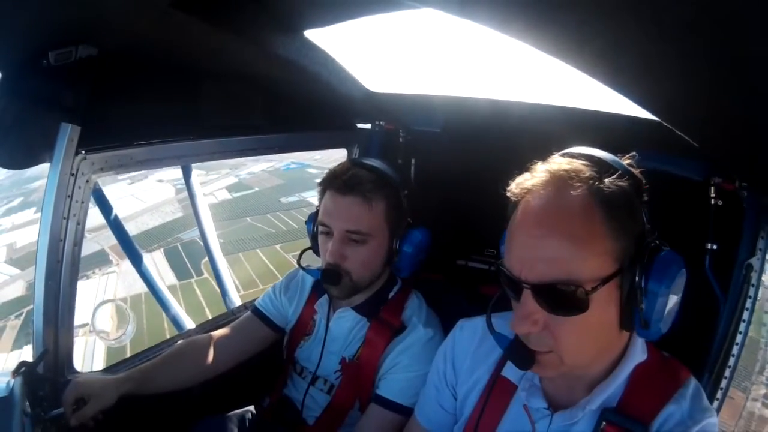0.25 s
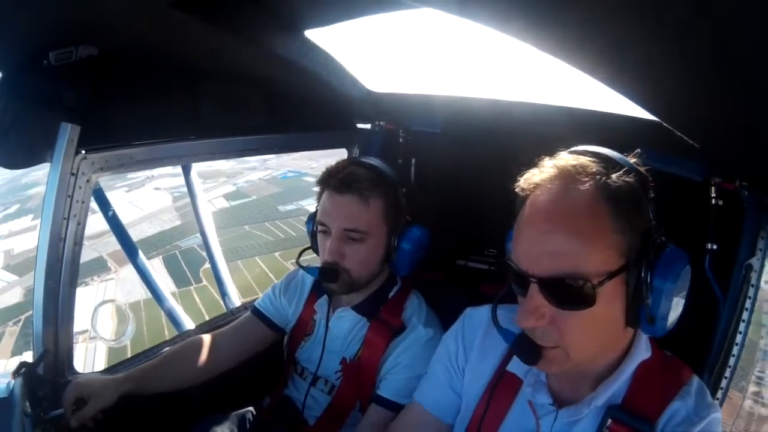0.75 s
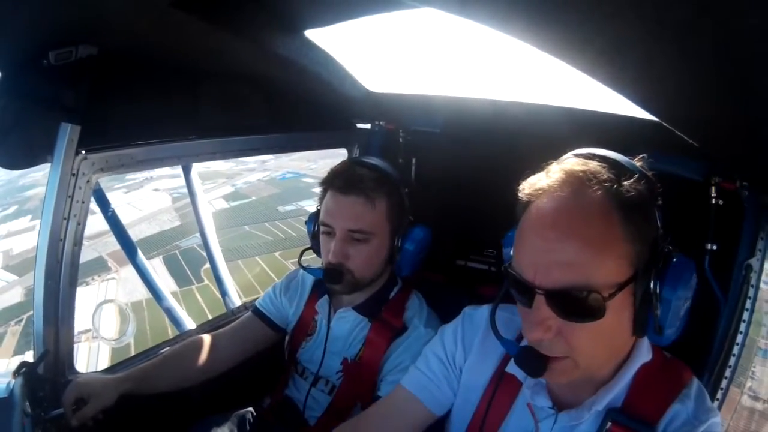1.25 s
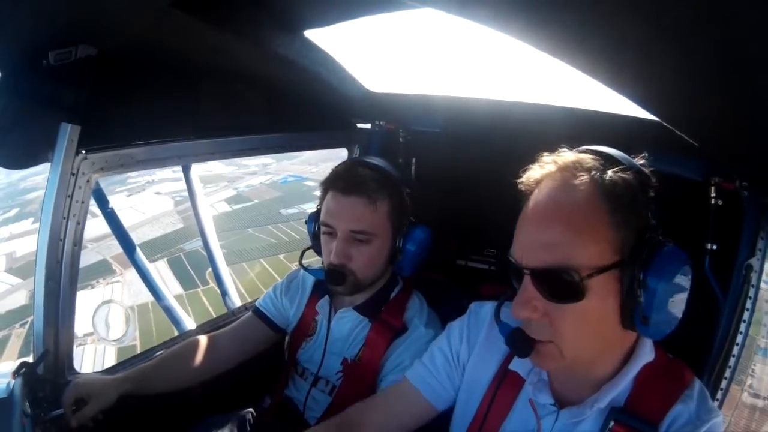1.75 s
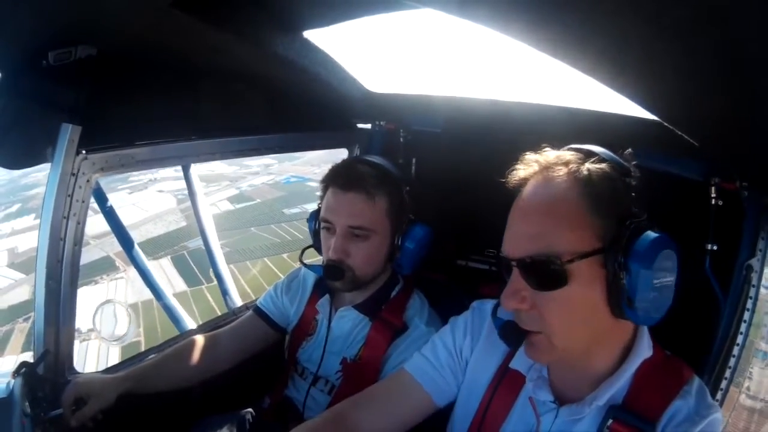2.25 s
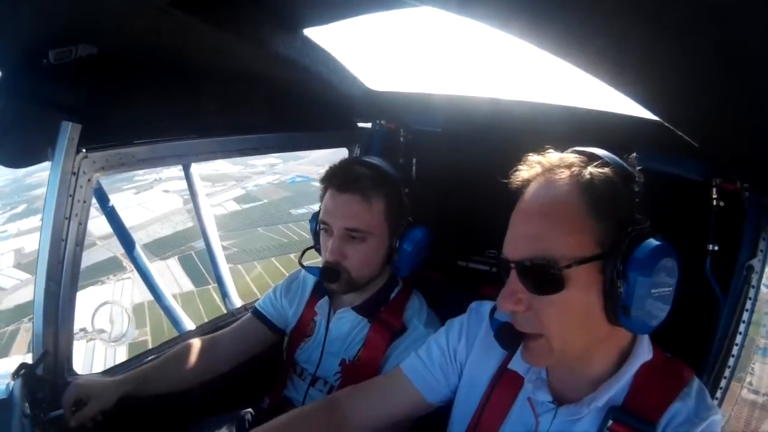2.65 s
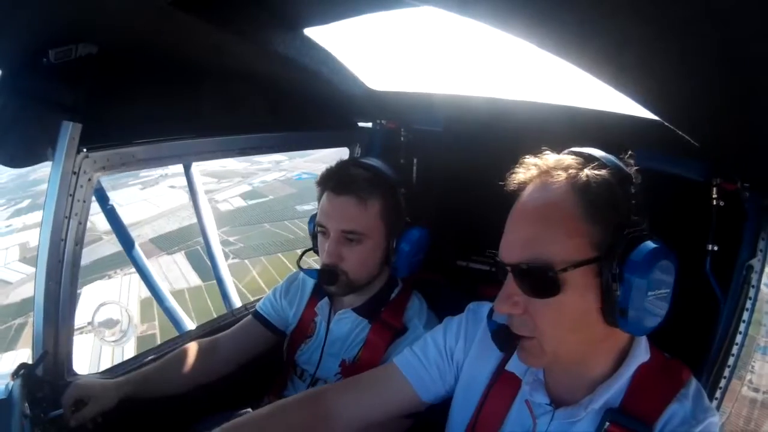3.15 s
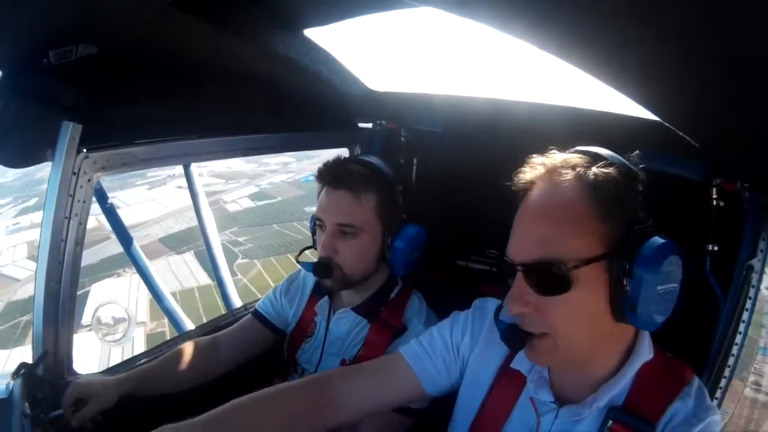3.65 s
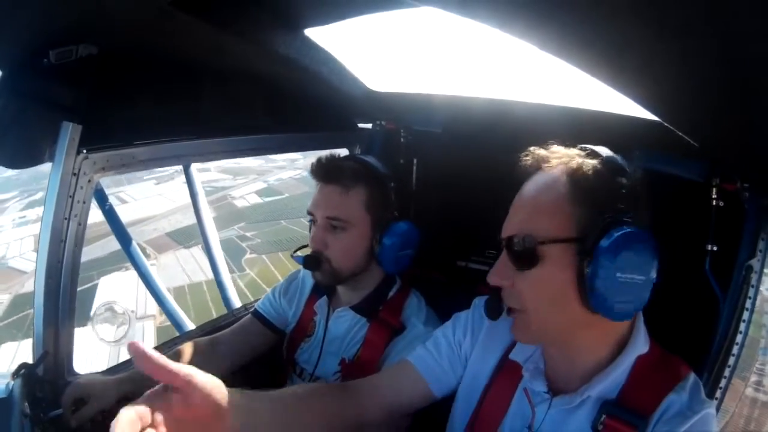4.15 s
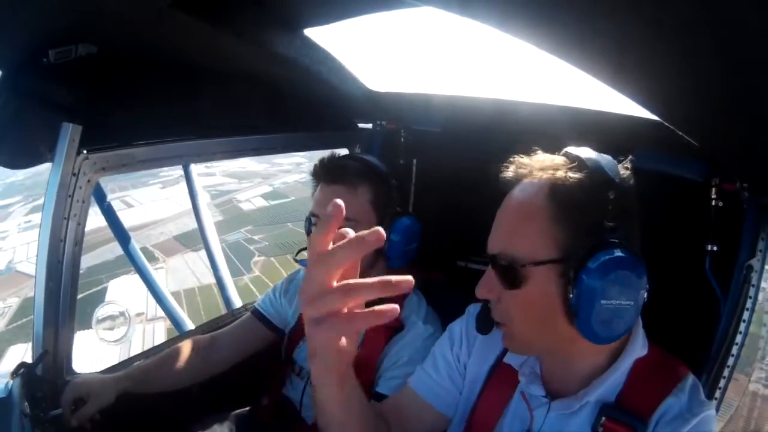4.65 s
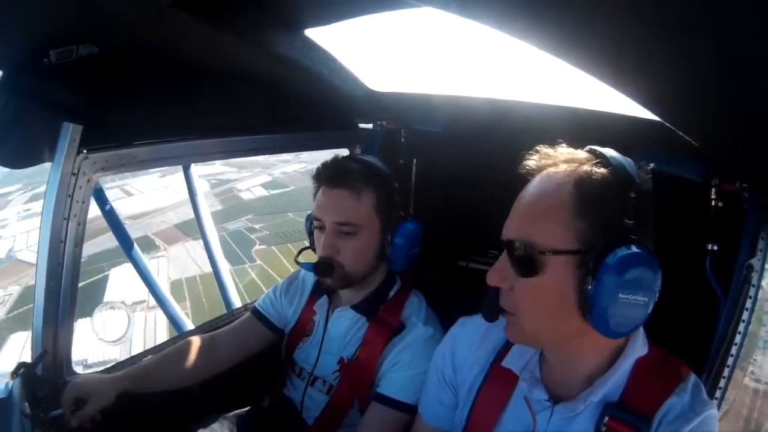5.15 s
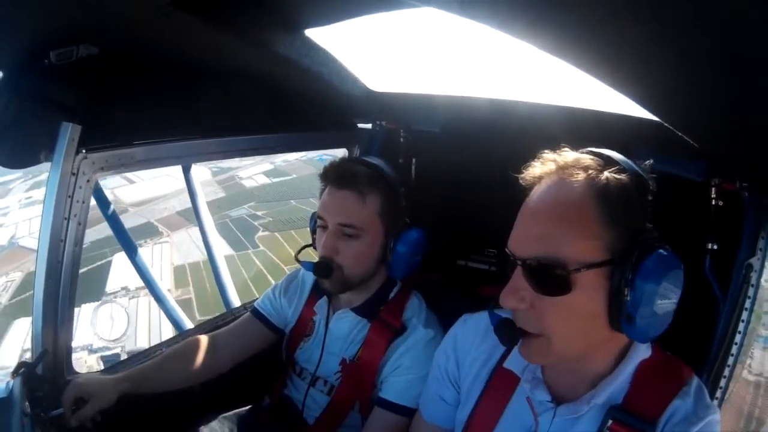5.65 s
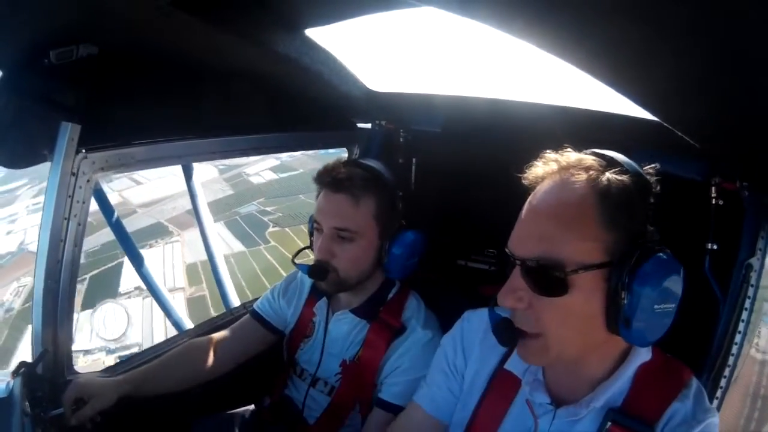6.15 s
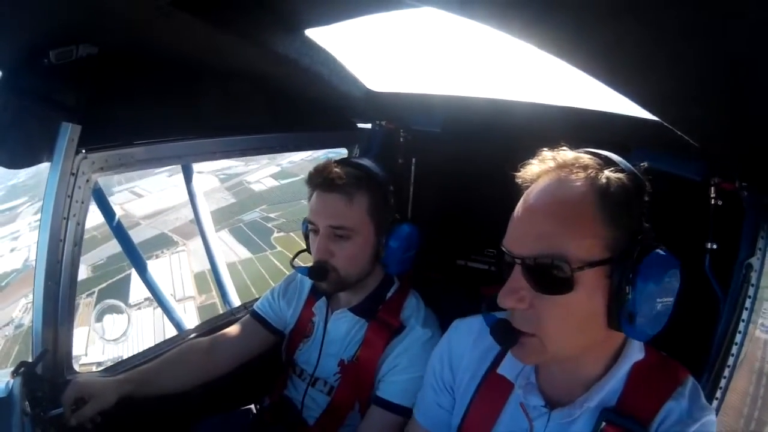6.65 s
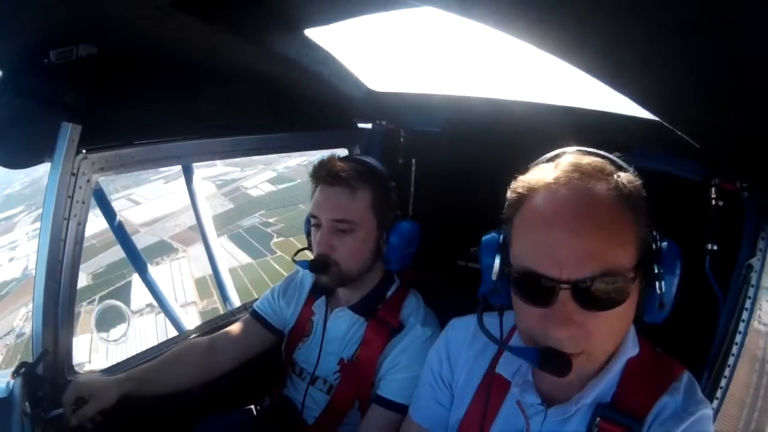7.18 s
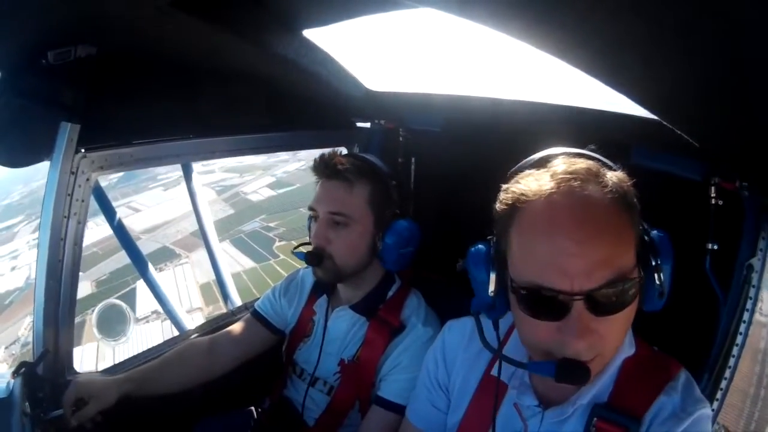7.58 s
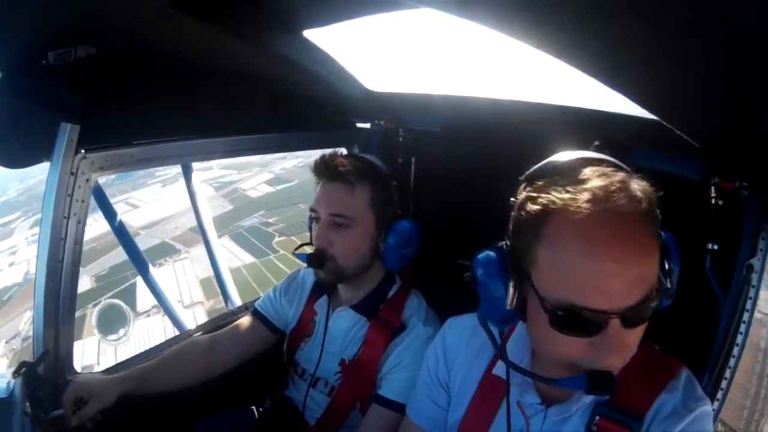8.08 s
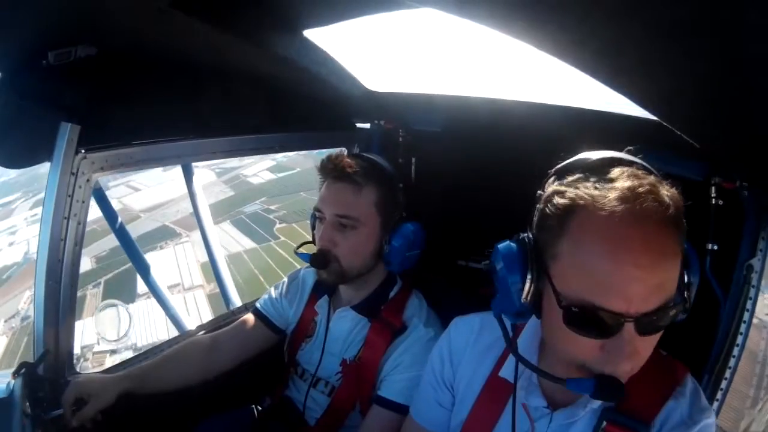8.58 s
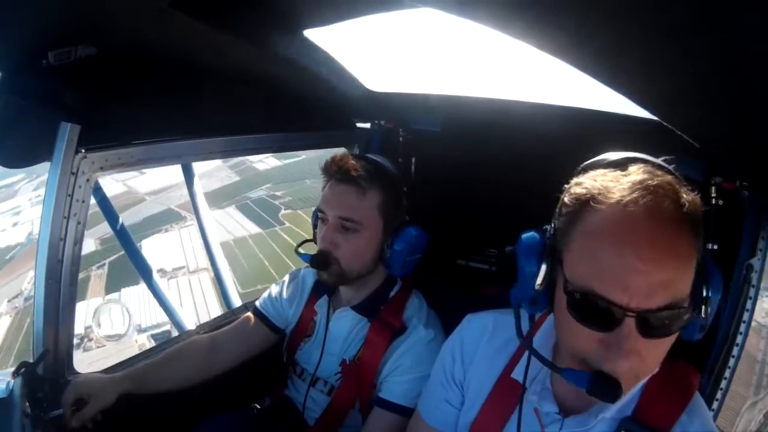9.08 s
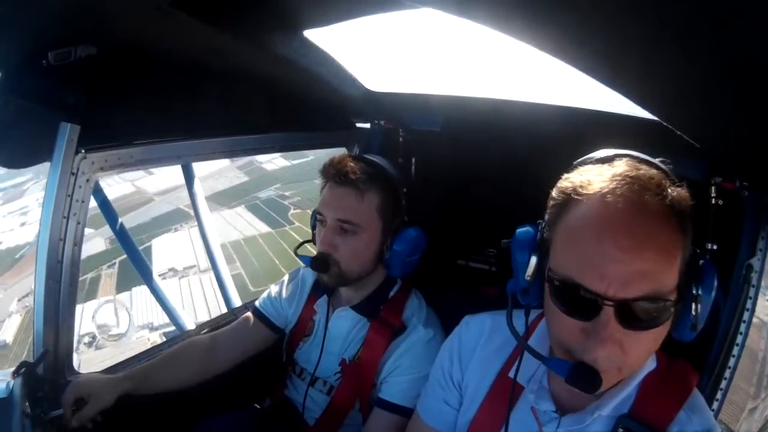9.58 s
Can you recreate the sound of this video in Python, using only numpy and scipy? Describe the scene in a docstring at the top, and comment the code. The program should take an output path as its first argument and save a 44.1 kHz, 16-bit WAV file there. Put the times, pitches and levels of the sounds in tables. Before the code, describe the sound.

A continuous, dense aircraft din fills a small cabin: low engine hum, rough exhaust drone, fast valve clatter and wavering propeller throb under a dark roar of rushing air. Gusts thump the cabin air in irregular low pulses throughout. Loudness rises and falls gently while pitch hardly changes. The onboard microphone sounds full and bass-heavy, with dull highs and slight ducking on peaks; no voices are heard.

```python
"""Inside the cabin of a light aircraft in cruise, for about ten seconds.
From the start a geared four-cylinder four-stroke sings in clean orders over a mechanical clatter, with an
exhaust drone and a gear whine; a three-blade propeller adds wavering lines, shaped noise makes the slipstream roar.
Throughout, the din swells and sags, and gusts shake two narrow-band air modes into a lumpy boom.
Around 1.3, 3.5 and 7 s the drone dips briefly; a gain control ducks the loudest moments."""
import sys
import numpy as np
from scipy import signal
from scipy.fft import rfft, irfft, next_fast_len
from scipy.io import wavfile
from scipy.ndimage import uniform_filter1d

SR = 44100
rng = np.random.default_rng(int(sys.argv[2]) if len(sys.argv) > 2 else 0)


def materialize(psi):
    """Save the field psi as 16-bit PCM at rate SR to the path in sys.argv[1].

    A 1-D psi becomes a single channel; in a 2-D psi each row is a channel.
    """
    bounded = np.clip(np.atleast_2d(psi).T, -1, 1)
    quanta = np.round(bounded * 32767).astype(np.int16)
    wavfile.write(sys.argv[1], SR, quanta)


N = 433062

CYLINDERS, GEAR_RATIO = 4, 3.473   # crank turns per propeller turn
DRONE_ORDER, WHINE_ORDER = 6, 36   # multiples of the four-stroke cycle rate


def from_db(db):
    """Decibels to gain."""
    return 10 ** (np.asarray(db) / 20)


def rms_one(x):
    """Scale to unit rms."""
    return x / np.sqrt(np.mean(np.abs(x) ** 2) + 1e-20)


def in_time(rows):
    """Each column of a curve after the time column, at every sample."""
    times, *columns = np.transpose(rows)
    return [np.interp(np.arange(N) / SR, times, column) for column in columns]


def drift(rate):
    """Slow random wander with about `rate` changes a second and a spread of 1."""
    step, warm_up = 100, 1000   # samples per slow step; slow steps discarded while the filter settles
    pole = np.exp(-2 * np.pi * rate * step / SR)
    noise = rng.standard_normal(N // step + warm_up + 2)
    slow = signal.lfilter([1], [1, -2 * pole, pole ** 2], noise)[warm_up:]
    return np.interp(np.arange(N) / step, np.arange(len(slow)), rms_one(slow))


def line(turns, wobble, rate):
    """A sine of rms about 1 on a count of turns; its strength and phase wander by `wobble`."""
    angle = 2 * np.pi * turns
    in_phase = (1 + wobble * drift(rate)) * np.cos(angle)
    quadrature = wobble * drift(rate) * np.sin(angle)
    return (in_phase + quadrature) * np.sqrt(2 / (1 + 2 * wobble ** 2))


# engine speed in cruise: (time [s], crankshaft speed [rpm])
ENGINE_SPEED = [(0.0, 5406.0), (1.29, 5442.0), (2.28, 5423.0), (2.48, 5440.0), (2.78, 5437.0),
                (3.07, 5449.0), (4.17, 5436.0), (4.36, 5430.0), (5.55, 5446.0), (6.15, 5433.0),
                (6.55, 5436.0), (6.94, 5411.0), (7.14, 5425.0), (7.84, 5403.0), (8.53, 5418.0),
                (9.82, 5402.0)]


def engine_speed():
    """Crankshaft speed in rpm, which sets the pitch of every engine and propeller line."""
    rpm, = in_time(ENGINE_SPEED)
    return rpm


# swell and sag that roar, tones and whine each follow in their own measure: (time [s], relative level [dB])
DIN_SWELL = [(0.0, 1), (0.8, 2), (1.55, -3), (1.85, -0.4), (2.1, -1.4), (2.35, 1.9), (2.8, -0.5), (3.15, 0),
             (4.0, -1), (4.3, -1), (5.8, -1.8), (5.97, 1.5), (6.45, -0.2), (7.5, -1.3), (7.85, 2.5),
             (8.7, -0.6), (9.35, 1.9), (9.82, -2.2)]


def din_level():
    """Slow loudness curve in dB shared by the roar, the tones and the gear whine."""
    din_db, = in_time(DIN_SWELL)
    return din_db


def rush(cycles, cycle_depth=0.026, crank_depth=0.045):
    """Turbulent air and exhaust hiss: white noise pulsing a little with the cycle and with the crank."""
    angle = 2 * np.pi * cycles
    pulse = 1 + cycle_depth * np.sin(angle) + crank_depth * np.cos(2 * angle)
    return rng.standard_normal(N) * pulse


# knock of each cylinder, in firing order: (relative strength [dB])
CYLINDER_KNOCKS = [-6, -1, -8.5, 6]


def clatter(cycles, ring_s=0.0019, uneven_db=2.0, low_hz=1100, high_hz=1750):
    """Each cylinder knocks once a cycle: a short decaying burst of valve and block noise, unevenly hard."""
    at = np.flatnonzero(np.diff(np.floor(CYLINDERS * cycles)))
    strength_db = np.resize(CYLINDER_KNOCKS, len(at)) + uneven_db * rng.standard_normal(len(at))
    knocks = np.zeros(N)
    knocks[at] = from_db(strength_db)
    decays = signal.lfilter([1], [1, -np.exp(-1 / (ring_s * SR))], knocks)
    bursts = rms_one(decays * rng.standard_normal(N))
    band = signal.butter(2, [low_hz, high_hz], "band", fs=SR, output="sos")
    return signal.sosfilt(band, bursts)


# slipstream through the cabin skin: (frequency [Hz], relative level [dB per Hz])
SKIN_SPECTRUM = [(22, -75), (33, -68), (47, -54), (85, -43.5), (150, -41.5), (200, -49.5), (480, -57.5),
                 (600, -63.5), (1900, -65.5), (2450, -74.5), (2680, -88.5), (4000, -92), (6200, -113),
                 (15700, -126)]
# resonances and dead spots of panels, windows and cabin: (centre [Hz], width at half lift [Hz], lift [dB])
PANEL_RESONANCES = [(105, 13, 1), (160, 3.9, -4), (268, 35, 4), (380, 55, 3), (472, 37, 4), (530, 52, 2.5),
                    (724, 79, 6.5), (1233, 153, 8), (1625, 170, 4.5), (1843, 130, 4), (2065, 45, -4),
                    (2946, 210, 8), (3500, 84, -5), (3550, 200, 5), (3935, 380, 6), (4613, 130, 9.5),
                    (4950, 170, 5.5), (5330, 250, 7), (14300, 700, 18.5)]


def cabin(x):
    """Colour a white excitation by the cabin skin and its resonant panels."""
    lead = SR // 2   # mirrored padding keeps the two ends from wrapping into each other
    size = next_fast_len(N + 2 * lead)
    hz = np.maximum(np.arange(size // 2 + 1) * SR / size, 1)
    points, levels = np.transpose(SKIN_SPECTRUM)
    db = np.interp(np.log(hz), np.log(points), levels)
    for centre, width, lift in PANEL_RESONANCES:
        db = db + lift * 0.5 ** ((2 * (hz - centre) / width) ** 2)
    spectrum = rfft(np.pad(x, lead, "reflect"), size) * from_db(db)
    return irfft(spectrum, size)[lead:lead + N] * np.sqrt(SR / 2)   # from level per Hz to full band


# strong engine lines: (multiple of the four-stroke cycle rate, relative level [dB])
ENGINE_LINES = [(2, -29.5), (3, -28.5), (4, -24), (5, -37), (8, -44.5), (11, -43), (12, -38.5), (14, -45.5),
                (15, -42), (16, -48), (18, -40.5), (21, -46), (22, -44.5), (23, -48), (24, -46),
                (27, -40.5), (28, -35), (30, -51.5), (32, -49.5), (34, -46), (38, -45), (39, -44),
                (44, -44), (46, -51), (48, -48.5), (52, -58.5)]


def engine_lines(cycles, scatter=0.3):
    """Engine orders locked to the cycle; paths through the airframe scatter their phases (in turns)."""
    out = np.zeros(N)
    for order, db in ENGINE_LINES:
        turns = order * cycles + scatter * rng.standard_normal()
        wobble = 0.064 + 0.0012 * order   # higher orders flutter more
        out += from_db(db - 0.8) * line(turns, wobble, rate=4.4)
    return out


def faint_lines(cycles, count=56):
    """Unequal cylinders fill in the remaining multiples of the cycle rate below `count`."""
    strong = [order for order, db in ENGINE_LINES] + [DRONE_ORDER, WHINE_ORDER]
    faint = [order for order in range(1, count) if order not in strong]
    return sum(line(order * cycles + rng.random(), wobble=0.3, rate=5.7) for order in faint)


# propeller lines: (multiple of the shaft rate, relative level [dB])
PROPELLER_LINES = [(1, -45.5), (6, -27.5), (9, -44.5), (12, -45), (15, -42.5), (18, -43)]


def propeller(turns):
    """Shaft and blade-passing lines; rough air makes the upper ones waver more."""
    out = np.zeros(N)
    for order, db in PROPELLER_LINES:
        out += from_db(db) * line(order * turns, wobble=0.2 + 0.047 * order, rate=1.7)
    return out


# brief dips of the drone: (time [s], half-length [s], depth [dB])
DIPS = [(1.34, 0.098, 7.5), (3.5, 0.22, 11), (7.03, 0.061, 8.5)]


def exhaust_drone(cycles, level_db=-28.5, wobble=0.2):
    """The third crank order: a strong line that wavers slowly and now and then dips."""
    t = np.arange(N) / SR
    dip_db = sum(depth * np.exp(-((t - centre) / half) ** 2) for centre, half, depth in DIPS)
    return from_db(level_db - dip_db) * line(DRONE_ORDER * cycles, wobble, rate=2.6)


def gear_whine(cycles, rpm, din_db, level_db=-39.5, cruise_rpm=5425, din_share=1.3, drop_db_per_rpm=0.17):
    """A gear line that swells with the din and fades as the engine speeds up."""
    db = level_db + din_share * din_db - drop_db_per_rpm * (rpm - cruise_rpm)
    return from_db(db) * line(WHINE_ORDER * cycles, wobble=0.2, rate=3.1)


def gusts(rows, calm_db, eddy_db, lift_db, rise_db_per_s=219.5, fall_db_per_s=220, eddies_per_s=8.0):
    """Level on an air mode: small random eddies, out of which each strong gust rises, holds and falls."""
    t = np.arange(N) / SR
    level_db = calm_db + eddy_db * np.tanh(drift(eddies_per_s))
    for start, length, db in rows:
        before_db = rise_db_per_s * np.maximum(start - t, 0)
        after_db = fall_db_per_s * np.maximum(t - start - length, 0)
        level_db = np.maximum(level_db, db + lift_db - before_db - after_db)
    return level_db


def boom(level_db, hz, width_hz, skirt, evenness=0.9):
    """A cabin air mode shaken by turbulence: narrow noise, partly evened so that the gusts set its strength."""
    shake = rms_one(drift(width_hz) + 1j * drift(width_hz))
    shake = shake / (np.abs(shake) ** 2 + 0.12) ** (evenness / 2)
    carrier = np.exp(2j * np.pi * hz * np.arange(N) / SR)
    mode = from_db(level_db) * rms_one(np.real(shake * carrier))
    edges = [hz / skirt, hz * skirt]   # the mode answers only near its own pitch
    return signal.sosfiltfilt(signal.butter(2, edges, "band", fs=SR, output="sos"), mode)


# strongest gusts on the low cabin air mode: (start [s], length [s], relative level [dB])
LOW_MODE_GUSTS = [(0.146, 0.042, -23), (0.813, 0.099, -20), (1.162, 0.17, -16), (1.946, 0.026, -21),
                  (3.33, 0.044, -17.5), (3.696, 0.04, -22.5), (4.187, 0.04, -19), (4.797, 0.116, -19.5),
                  (5.084, 0.03, -20), (5.236, 0.064, -19), (5.791, 0.07, -18), (6.392, 0.06, -19),
                  (6.703, 0.11, -20), (7.052, 0.052, -21), (7.16, 0.102, -17), (7.364, 0.11, -21),
                  (7.848, 0.043, -18.5), (8.457, 0.098, -18), (8.78, 0.06, -20.5), (8.865, 0.052, -21),
                  (9.103, 0.068, -21), (9.44, 0.23, -18.5)]
# strongest gusts on the upper cabin air mode: (start [s], length [s], relative level [dB])
UPPER_MODE_GUSTS = [(0.623, 0.034, -14), (0.865, 0.07, -13), (1.149, 0.049, -18.5), (1.878, 0.029, -16),
                    (2.348, 0.031, -17), (2.513, 0.05, -17.5), (3.323, 0.032, -13.5), (3.75, 0.07, -14.5),
                    (3.888, 0.079, -11.5), (4.15, 0.031, -18), (4.347, 0.053, -15), (4.789, 0.03, -16),
                    (5.245, 0.029, -16), (5.377, 0.061, -13.5), (6.09, 0.024, -17), (6.308, 0.04, -14.5),
                    (6.674, 0.032, -17), (6.87, 0.038, -16.5), (7.41, 0.029, -16), (7.988, 0.052, -14.5),
                    (8.291, 0.03, -15.5), (8.481, 0.033, -16), (8.7, 0.034, -16)]


def buffeting():
    """The slipstream shakes two modes of the cabin air."""
    low_db = gusts(LOW_MODE_GUSTS, calm_db=-26.0, eddy_db=5.0, lift_db=0.5)
    upper_db = gusts(UPPER_MODE_GUSTS, calm_db=-23.0, eddy_db=5.5, lift_db=1.0)
    low = boom(low_db, hz=61.85, width_hz=5.3, skirt=1.4)
    upper = boom(upper_db, hz=135.14, width_hz=12.0, skirt=1.25)
    return low + upper


def scene():
    """Engine, propeller and slipstream as they reach the seats."""
    rpm, din_db = engine_speed(), din_level()
    crank = np.cumsum(rpm / 60) / SR   # turns so far
    cycles = crank / 2   # one four-stroke cycle takes two turns
    excitation = from_db(-0.03) * rush(cycles)
    excitation += from_db(-2.5) * clatter(cycles)
    excitation += from_db(-35) * faint_lines(cycles)
    roar = from_db(din_db) * cabin(excitation)
    tones = engine_lines(cycles) + propeller(crank / GEAR_RATIO) + exhaust_drone(cycles)
    tones *= from_db(0.6 * din_db + 0.86)   # the tones follow the din less than the roar does
    mix = roar + tones + gear_whine(cycles, rpm, din_db) + buffeting()
    return mix[None]   # one channel


def gain_control(x, limit_db=-13.5, slope=0.6, window_s=0.024, attack_s=0.012, release_db_per_s=12.5):
    """Level above the limit pushes the whole sound down by `slope` dB per dB, then lets go steadily."""
    power = uniform_filter1d(np.mean(x ** 2, axis=0), int(window_s * SR))
    excess_db = np.maximum(10 * np.log10(np.maximum(power, 1e-12)) - limit_db, 0)
    # a running maximum on a rising ramp holds each peak and releases it at the ramp's rate
    release_db = release_db_per_s * np.arange(N) / SR
    cut_db = np.maximum.accumulate(slope * excess_db + release_db) - release_db
    pole = np.exp(-1 / (attack_s * SR))
    return x * from_db(-signal.lfilter([1 - pole], [1, -pole], cut_db))


def record(dry, hiss_db=-70, cutoff_hz=15900):
    """Gain control and a faint steady microphone hiss; the top is cut steeply."""
    hiss_filter = signal.butter(1, 9000, fs=SR, output="sos")
    hiss = rms_one(signal.sosfilt(hiss_filter, rng.standard_normal(N)))
    top_cut = signal.cheby2(20, 50, cutoff_hz, fs=SR, output="sos")
    return signal.sosfilt(top_cut, gain_control(dry) + from_db(hiss_db) * hiss)


dry = scene()
out = record(dry)
materialize(out)
```